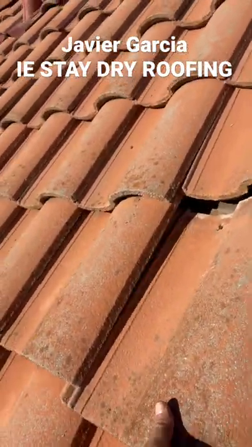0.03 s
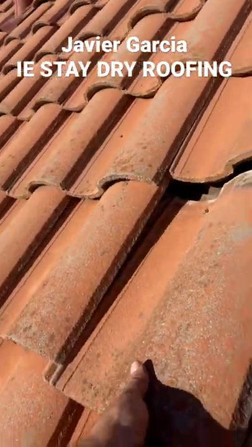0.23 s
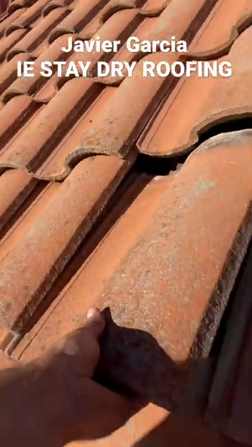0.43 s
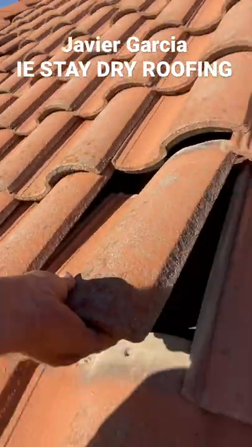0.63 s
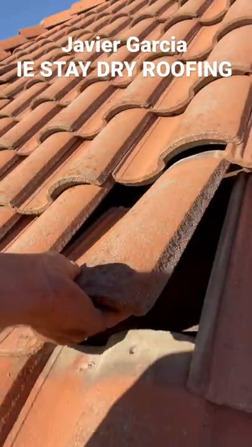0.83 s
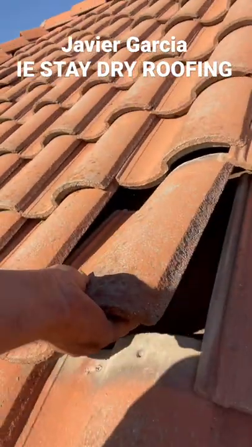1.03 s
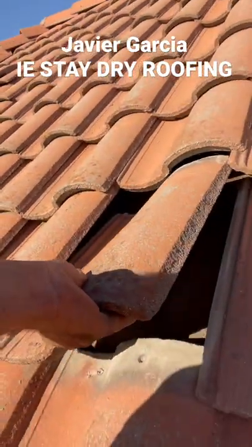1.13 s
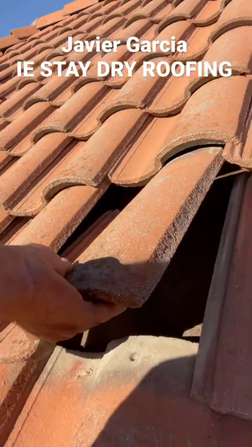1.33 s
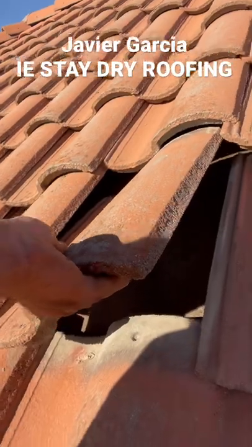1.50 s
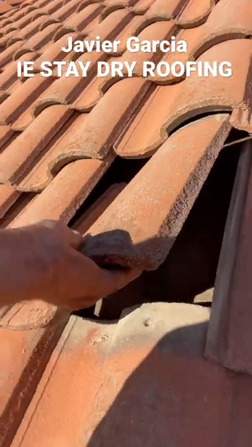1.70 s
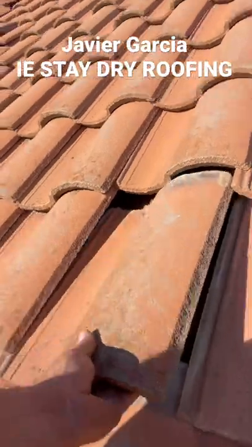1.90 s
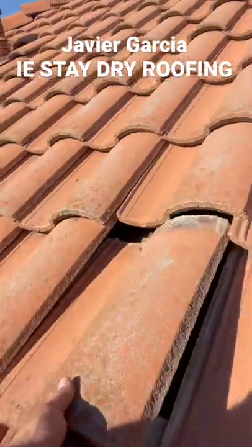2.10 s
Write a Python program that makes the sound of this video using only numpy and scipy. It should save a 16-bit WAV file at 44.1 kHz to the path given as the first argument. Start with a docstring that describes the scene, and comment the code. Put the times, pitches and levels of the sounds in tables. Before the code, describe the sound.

A clay roof tile is worked loose with gritty scraping and clinks, ticks lightly as it is lifted, then knocks back down with dull thuds. Wind rumbles and puffs on the close outdoor microphone.

```python
"""A clay roof tile is worked loose by hand, lifted and lowered, close to a small stereo mic outdoors.
Sand grates between the tiles and the clay rubs dryly. The tile's lip catches and rings; the tile
knocks on its neighbours and thuds on the wooden battens. Grit snaps under its edge.
Wind buffets the mic with rumble and short puffs, over faint outdoor air."""
import sys
import numpy as np
from scipy import signal
from scipy.fft import rfft, irfft, next_fast_len
from scipy.io import wavfile
from scipy.ndimage import map_coordinates

SR = 44100
rng = np.random.default_rng(int(sys.argv[2]) if len(sys.argv) > 2 else 0)


def bounce(signal):
    """Save signal as a 16-bit WAV file at the path given by the first command-line argument."""
    frames = np.transpose(np.atleast_2d(signal))
    limited = np.clip(frames, -1, 1)
    pcm = np.round(limited * 32767).astype(np.int16)
    wavfile.write(sys.argv[1], SR, pcm)


N = 94903
EVENT_S = np.arange(SR // 4) / SR  # time axis of one short event
PAN = np.array([[.5], [-.5]])  # splits a left-right difference

# Tile modes. Each row: frequency in Hz, level in dB, T60 in seconds.
TILE_MODES = [(406, 1.5, 0.086), (888, 3, 0.062), (1086, -2, 0.069), (1270, 9, 0.014), (1465, -0.5, 0.061),
              (1819, -2.5, 0.064), (2120, -0.5, 0.044), (2274, -5.5, 0.065), (2480, -3.5, 0.099),
              (3035, -2.5, 0.068), (3776, -2, 0.075), (4150, -22.5, 0.036)]


def amp(db):
    """Decibels to gain."""
    return 10 ** (np.asarray(db) / 20)


def unit_rms(x):
    """Scale to rms 1."""
    return x / np.sqrt(np.mean(x ** 2) + 1e-20)


def unit_energy(x):
    """Scale to energy 1."""
    return x / np.sqrt(np.sum(x ** 2) + 1e-20)


def unit_onset(x):
    """Scale to rms 1 over the first 10 ms."""
    return x / np.sqrt(np.mean(x[:SR // 100] ** 2))


def along(points, hz):
    """Interpolate (Hz, value) points on a log axis."""
    knots_hz, values = np.transpose(points)
    return np.interp(np.log(hz + 1), np.log(knots_hz + 1), values)


def envelope(points):
    """Gain per sample from (s, dB) points."""
    return amp(np.interp(np.arange(N) / SR, *np.transpose(points)))


def filtered(x, response):
    """Apply a frequency response by FFT."""
    n = x.shape[-1]
    size = next_fast_len(n + SR // 4)
    return irfft(rfft(x, size) * response(np.fft.rfftfreq(size, 1 / SR)), size)[..., :n]


def colour(x, points, size=4096):
    """Minimum-phase filter through (Hz, dB) points."""
    cepstrum = irfft(np.log(amp(along(points, np.fft.rfftfreq(size, 1 / SR)))))
    cepstrum[1:size // 2] *= 2
    cepstrum[size // 2 + 1:] = 0
    return signal.fftconvolve(x, irfft(np.exp(rfft(cepstrum))))[:len(x)]


def stereo_noise(points, side_db):
    """Mid and side noise shaped by (Hz, dB) points."""
    mid, side = filtered(rng.standard_normal((2, N)), lambda hz: amp(along(points, hz)))
    return unit_rms(mid) + amp(side_db) * unit_rms(side) * np.array([[1], [-1]])


def wobble(knots_per_s):
    """Smooth random curve."""
    return map_coordinates(rng.standard_normal(N), [np.arange(N) * knots_per_s / SR])


def decay(t60_s):
    """Exponential decay."""
    return np.exp(-np.log(1000) * EVENT_S / t60_s)


def burst(t60_s):
    """Decaying noise of energy 1."""
    return unit_energy(rng.standard_normal(len(EVENT_S)) * decay(t60_s))


def ring(modes, scatter_db=2):
    """Modes of a struck body; strength and sign vary per blow."""
    out = np.zeros(len(EVENT_S))
    for hz, db, t60_s in modes:
        gain = amp(db + scatter_db * rng.normal()) * rng.choice([-1, 1])
        out += gain * np.sin(2 * np.pi * hz * EVENT_S) * decay(t60_s)
    return unit_energy(out)


def attack(contact_s):
    """Rough clay meets gradually: force builds over a share of the contact."""
    return 1 - np.exp(-EVENT_S / (0.066 * contact_s))


def crunch(points, contact_s, t60_s):
    """Coloured noise that holds during contact, then dies."""
    release = np.exp(-np.log(1000) * np.maximum(EVENT_S - contact_s, 0) / t60_s)
    return unit_energy(colour(rng.standard_normal(len(EVENT_S)) * attack(contact_s) * release, points))


def add(track, start_s, x):
    """Mix x into the track."""
    part = track[max(0, round(start_s * SR)):][:len(x)]
    part += x[:len(part)]


def grating(contacts=6, grains_per_s=900):
    """Sand catches and slips at several contacts between tiles; each rings the clay in its own way."""
    # Each row: time in seconds, level in dB.
    levels = [(0, -41), (.02, -35.5), (.075, -29.5), (.135, -28.5), (.16, -87), (.52, -61), (.53, -36),
              (.6, -32), (.63, -37.5), (.665, -34), (.75, -50), (.805, -32.5), (.825, -53), (1.09, -52.5),
              (1.11, -40), (1.19, -31), (1.23, -45), (1.37, -56.5), (1.56, -48.5), (1.59, -37.5),
              (1.63, -51), (1.77, -40), (1.82, -29), (1.91, -30), (1.975, -39.5), (2.01, -46.5),
              (2.05, -48.5), (2.12, -35.5)]
    # One grain. Each row: frequency in Hz, level in dB.
    grain_spectrum = [(100, -21.5), (400, 12), (1500, 11.5), (2600, 5), (3800, 2), (4800, -2.5), (6500, 4),
                      (9200, -1), (11000, -7.5), (12000, -18.5), (15500, -25.5)]
    out = np.zeros(N)
    for _ in range(contacts):
        grains = (rng.random(N) < grains_per_s / SR) * rng.standard_normal(N)
        grains *= amp(-0.5 * np.minimum(rng.exponential(size=N), 3))
        stutter = amp(3 * wobble(knots_per_s=65))
        force = unit_rms(grains * stutter) * envelope(levels)
        tick = unit_energy(colour(burst(t60_s=0.00081), grain_spectrum))
        body = tick + amp(-4) * ring(TILE_MODES, scatter_db=5)
        out += signal.fftconvolve(force, unit_energy(body))[:N]
    return out / np.sqrt(contacts)


def rubbing():
    """A soft dry rub catches and slips, roughened by the grain of the clay."""
    # Each row: time in seconds, level in dB.
    levels = [(0, -44), (.17, -49.5), (.27, -44.5), (.41, -41), (.51, -49), (.76, -80), (.82, -44.5),
              (.89, -43), (.95, -52), (1.08, -54.5), (1.17, -37), (1.27, -39.5), (1.38, -61), (1.45, -48.5),
              (1.60, -33), (1.72, -37.5), (1.93, -37), (2.05, -45.5), (2.15, -56)]
    # Each row: frequency in Hz, level in dB.
    spectrum = [(100, 12.5), (700, -16), (1400, 0.5), (2200, 2), (3100, 3.5), (4600, -7), (5500, -10),
                (9000, -19.5), (11000, -25.5), (12500, -39), (15500, -53)]
    grain_db = wobble(knots_per_s=300)
    catch_db = 2.2 * wobble(knots_per_s=35)
    return envelope(levels) * unit_rms(stereo_noise(spectrum, side_db=-13.5) * amp(grain_db + catch_db))


def wind_rumble():
    """Gusts rumble on the mic ports."""
    # Each row: time in seconds, level in dB.
    gusts = [(0, -23), (.055, -19.5), (.11, -21.5), (.19, -25), (.23, -33.5), (.28, -17.5), (.37, -24),
             (.44, -26), (.56, -37.5), (.63, -33.5), (.69, -25.5), (.80, -36), (.89, -29), (.93, -37.5),
             (1.08, -41), (1.20, -29.5), (1.34, -45), (1.42, -45.5), (1.51, -28), (1.58, -41),
             (1.83, -33.5), (1.9, -12.5), (2.0, -34), (2.15, -30)]
    # Each row: frequency in Hz, level in dB.
    spectrum = [(20, -44), (38, -29), (52, -3), (80, 0), (120, -5), (170, -10), (260, -15), (450, -26.5),
                (800, -44.5), (6000, -100)]
    return envelope(gusts) * stereo_noise(spectrum, side_db=-5)


def outdoor_air():
    """Faint, steady, wide background."""
    # Each row: frequency in Hz, level in dB.
    spectrum = [(30, -4), (200, 8), (600, -13), (1500, -19), (4000, -32.5), (10000, -33.5), (12500, -39)]
    return amp(-53) * stereo_noise(spectrum, side_db=4)


def chinks(jitter_rad=0.6, twin_ratio=1.07, twin_db=-10.5):
    """The lip catches and rings on one mode and a weaker twin; sliding roughens the ring."""
    # Each row: start in seconds, level in dB, pitch in Hz, T60 in seconds.
    catches = [(.023, -28, 3560, 0.12), (.090, -22.5, 3567, 0.077), (.108, -26, 2800, 0.061),
               (.547, -23, 2113, 0.041), (0.77, -29, 1354, 0.074), (1.866, -27.5, 3875, 0.19),
               (1.918, -19.5, 1697, 0.073), (1.956, -27.5, 2050, 0.078), (1.995, -23.5, 3897, 0.064),
               (2.099, -35, 2760, 0.092)]
    out = np.zeros(N)
    for start_s, db, hz, t60_s in catches:
        phase = 2 * np.pi * hz * EVENT_S + jitter_rad * wobble(knots_per_s=350)[:len(EVENT_S)]
        tone = np.sin(phase) + amp(twin_db) * np.sin(twin_ratio * phase)
        add(out, start_s, amp(db) * tone * decay(t60_s) * attack(contact_s=0.011))
    return out


def knocks(punch_hz=847):
    """Tile on tile: a dead clack, a punch from the hollow curve and a short ring."""
    # Each row: start in seconds, relative level in dB, body gain in dB, edge gain in dB,
    # contact in seconds.
    blows = [(0.0339, -4.5, 3.5, -7.5, 0.0064), (.072, -21, -15, 11, 0.0047), (0.091, -20, -8, 17, 0.0025),
             (0.1255, -10, -1, 2, 0.001), (0.5628, -21.5, -6.5, 1.5, 0.0093), (0.581, -24, -11, 8, 0.0023),
             (0.586, -15, 4.5, -4.5, 0.0015), (0.77, -29.5, -14, 3.5, 0.0051), (.909, -27, 6.5, 8, 0.0011),
             (1.160, -22.5, -32, -29, 0.005), (1.814, -21.5, -11.5, 9.5, 0.0013),
             (1.866, -11.5, -6, -11, 0.0035), (1.9181, -18.5, -7, -9, 0.0075),
             (1.992, -21.5, -27, 10, 0.0099), (2.132, -21.5, -3, 7.5, 0.0087),
             (2.147, -11.5, -7.5, -2, 0.0017)]
    # Each row: frequency in Hz, level in dB.
    clack_spectrum = [(100, -40), (280, -6.5), (450, 8), (850, 1.5), (1700, 2.5), (2700, -11), (4000, -10),
                      (4900, -19.5), (9000, -18), (11000, -26.5), (12000, -33), (15500, -39)]
    punch = unit_energy(np.sin(2 * np.pi * punch_hz * EVENT_S) * decay(t60_s=0.019))
    out = np.zeros(N)
    for start_s, db, body_db, edge_db, contact_s in blows:
        clack = crunch(clack_spectrum, contact_s, t60_s=0.052)
        resonance = (amp(-0.5) * punch + amp(-4.5) * ring(TILE_MODES)) * attack(contact_s)
        # Colour depends on where the blow lands.
        spot_eq = [(400, 0.0041), (850, body_db), (1400, 0), (2300, 0), (3400, edge_db)]
        add(out, start_s, amp(db - 6.5) * unit_onset(colour(clack + resonance, spot_eq)))
    return out


def thuds():
    """The tile's weight lands on the wooden battens."""
    # Each row: start in seconds, level in dB.
    landings = [(0.045, -29.5), (1.167, -21.5), (1.814, -17), (1.879, -23)]
    # Each row: frequency in Hz, level in dB, T60 in seconds.
    batten_modes = [(142, -14.5, 0.043), (214.4, 2, 0.19), (258, 1.5, 0.11), (351.2, -1, 0.15),
                    (473.7, -4, 0.11)]
    out = np.zeros(N)
    for start_s, db in landings:
        add(out, start_s, amp(db) * unit_onset(ring(batten_modes)))
    return out


def wind_puffs(rise_cycles=0.82, sag=0.1, roughness=0.47):
    """Single eddies hit the mic as short puffs that fall in pitch."""
    # Each row: start in seconds, relative level in dB, initial pitch in Hz.
    eddies = [(0.056, 0.5, 133), (0.252, -20, 337), (.269, -7.5, 302), (0.271, -3, 129), (.306, -6.5, 340),
              (0.324, -19, 520), (.338, -11.5, 270), (0.342, -3, 100.5), (0.36, -14, 92),
              (0.407, -15.5, 221), (0.452, -22, 288), (0.652, -12, 347), (0.674, -15, 364),
              (0.709, -18, 340), (0.737, -16, 275), (0.835, -20, 340), (.855, -18, 327),
              (0.885, -19.5, 300), (1.882, -1, 180)]
    out = np.zeros(N)
    for start_s, db, hz in eddies:
        age = EVENT_S * hz / rise_cycles
        swell = (age * np.exp(1 - age)) ** 2
        push = np.sin(2 * np.pi * rise_cycles * np.log1p(sag * age) / sag)
        low_pass = [(hz, 0), (2 * hz, -10), (8 * hz, -50), (SR / 2, -110)]
        turbulence = unit_rms(colour(rng.standard_normal(len(age)), low_pass))
        add(out, start_s, amp(db) * swell * (push + roughness * turbulence) / 2)
    return out


def snaps():
    """Grit breaks under the edge with a bright tick that barely rings the tile."""
    # Each row: start in seconds, relative level in dB, treble gain in dB, contact in seconds.
    breaks = [(0.655, -35, -6, 0.0076), (0.796, -31, -5, 0.011), (0.909, -22.5, 2.5, 0.0012),
              (0.963, -34.5, -12, 0.011), (1.006, -29, -9.5, 0.011), (1.025, -31.5, -10.5, 0.0046),
              (1.102, -34, -9, 0.012), (1.157, -27.5, -3.5, 0.0077), (1.348, -39.5, -3, 0.0021),
              (1.432, -49.5, 12, 0.0027), (1.472, -42.5, -8, 0.0028), (1.532, -38.5, -11, 0.002)]
    # Each row: frequency in Hz, level in dB.
    spectrum = [(150, -3), (550, -13), (900, -0.5), (1400, 2), (3600, -3.5), (5000, -4), (8000, 5),
                (11000, -3), (12000, -16.5), (15500, -32)]
    out = np.zeros(N)
    for start_s, db, treble_db, contact_s in breaks:
        tick = crunch(spectrum, contact_s, t60_s=0.036) + amp(-17) * ring(TILE_MODES)
        tick = colour(tick, [(4000, 0), (7500, treble_db)])
        add(out, start_s, amp(db - 3.5) * unit_onset(tick))
    return out


def roof_scatter(x):
    """Short reflections from nearby tiles and the hollow beneath, different per side."""
    build_up = 1 - decay(t60_s=0.014)
    responses = [unit_energy(burst(t60_s=0.039) * build_up) for _ in range(2)]
    return np.array([signal.fftconvolve(x, response)[:N] for response in responses])


def scene():
    """The tile and its scatter, with rubbing, wind and open air."""
    # The knocks' hollow punch leans right. Each row: frequency in Hz, left minus right in dB.
    knock_lean = [(350, -0.5), (850, -4), (1800, 0)]
    blows = knocks()
    centred = chinks() + snaps() + thuds() + grating()
    direct = centred + filtered(blows, lambda hz: amp(PAN * along(knock_lean, hz)))
    scatter = amp(-8) * roof_scatter(blows + centred)
    return direct + scatter + rubbing() + wind_puffs() + wind_rumble() + outdoor_air()


def record(dry, low_cut_hz=21.4, top_hz=15600, ceiling=0.92):
    """Stereo mic: two ports unequal in level and treble phase, low cut, soft overload, band limit."""
    # Stereo width, narrow in the bass and top octave. Each row: frequency in Hz, side gain in dB.
    width = [(30, -18), (120, 0), (350, 0.5), (3000, 6.5), (10500, 4.5), (11700, -12)]
    # Each row: frequency in Hz, left minus right in dB.
    port_balance = [(60, 0), (250, -1.5), (750, -3), (1200, -2.5), (1900, 1), (2700, -1.5), (3500, -0.5),
                    (12000, 0)]
    # Each row: frequency in Hz, left lead in radians.
    port_phase = [(4300, 0), (5000, -3.1), (6000, -3.7), (8000, -4.4), (9500, -5.1), (11200, -6.28)]

    def response(hz):
        """Complex gain of each port, with the low cut."""
        balance = amp(PAN * along(port_balance, hz))
        phase_rad = PAN * np.interp(hz, *np.transpose(port_phase))
        low_cut = hz ** 4 / (hz ** 4 + low_cut_hz ** 4)
        return balance * np.exp(1j * phase_rad) * low_cut

    side = filtered(dry[0] - dry[1], lambda hz: amp(along(width, hz)))
    heard = filtered(dry.mean(0) + PAN * side, response)
    rounded = heard / (1 + (heard / ceiling) ** 8) ** (1 / 8)
    return filtered(rounded, lambda hz: hz < top_hz)


dry = scene()
out = record(dry)
bounce(out)
```